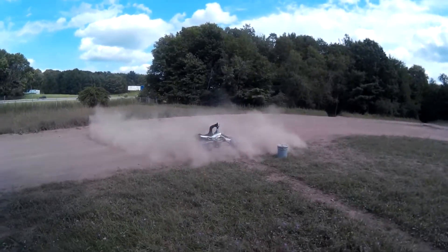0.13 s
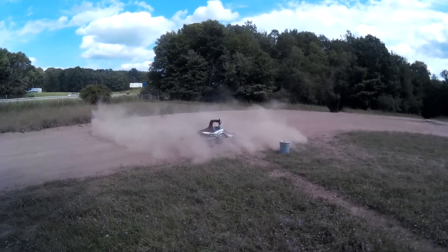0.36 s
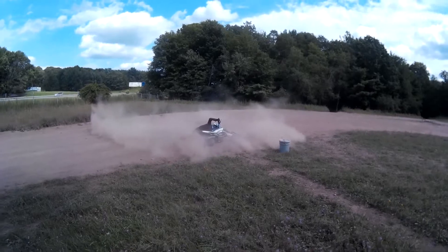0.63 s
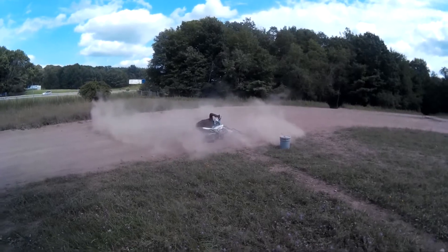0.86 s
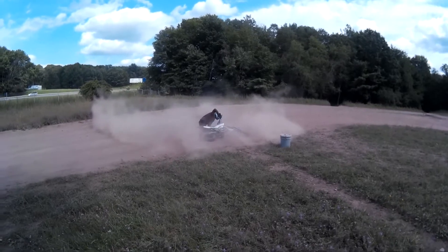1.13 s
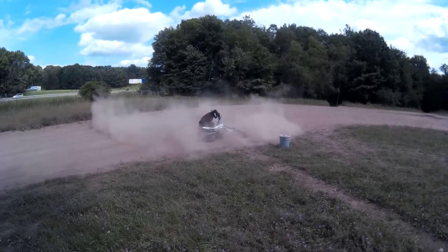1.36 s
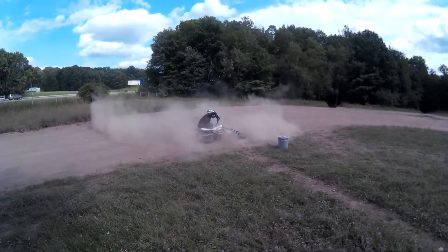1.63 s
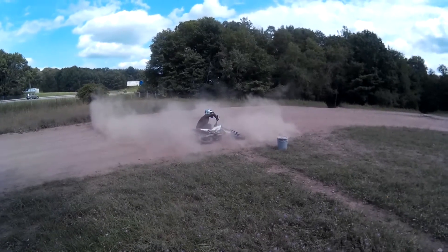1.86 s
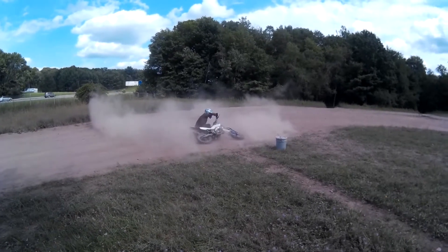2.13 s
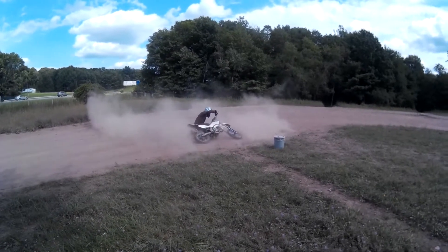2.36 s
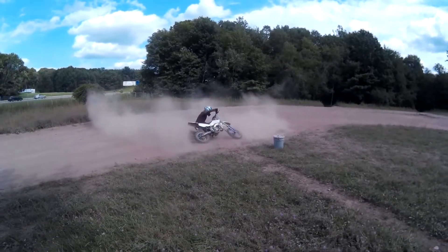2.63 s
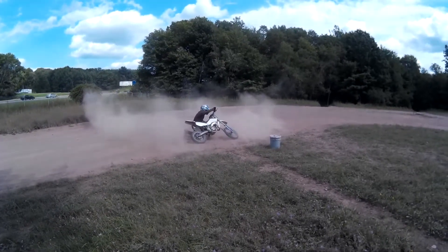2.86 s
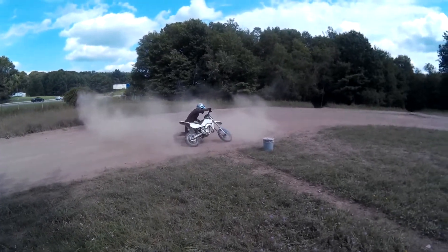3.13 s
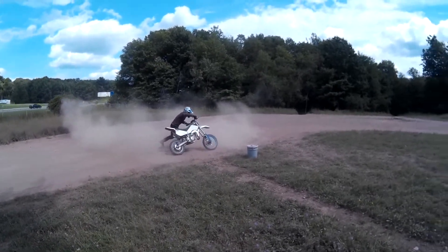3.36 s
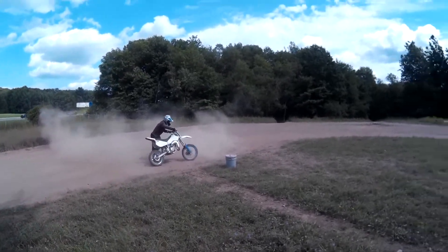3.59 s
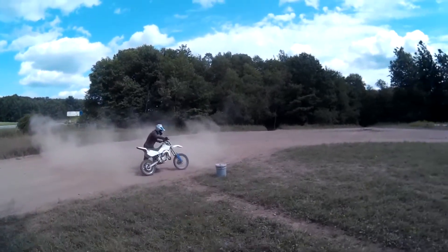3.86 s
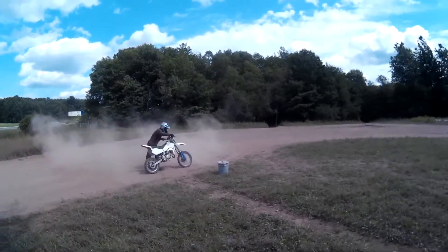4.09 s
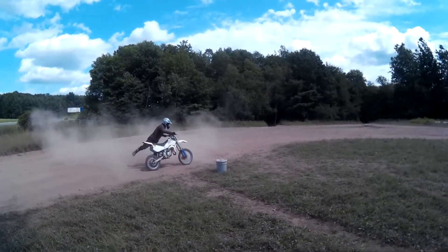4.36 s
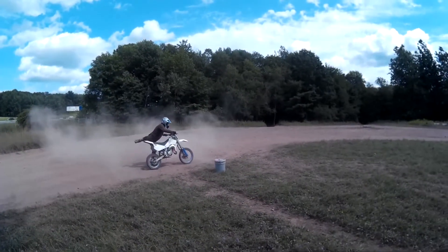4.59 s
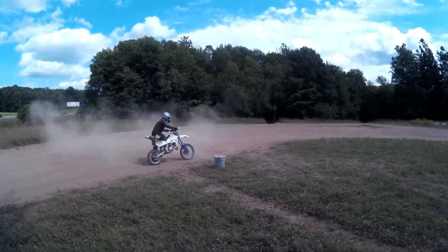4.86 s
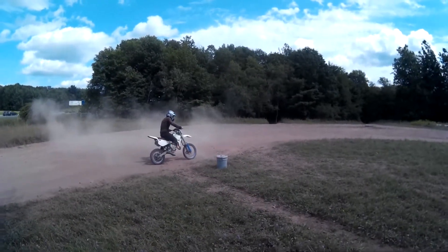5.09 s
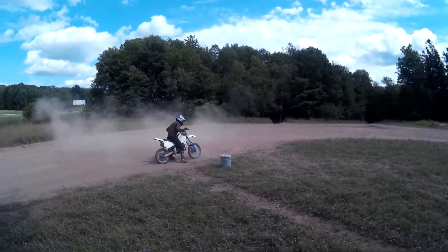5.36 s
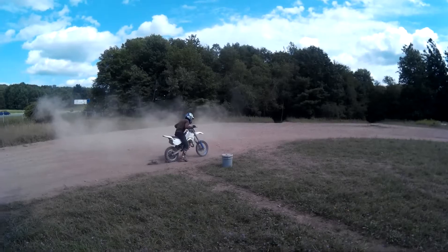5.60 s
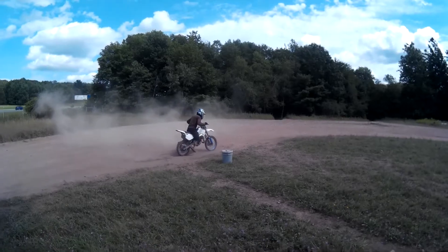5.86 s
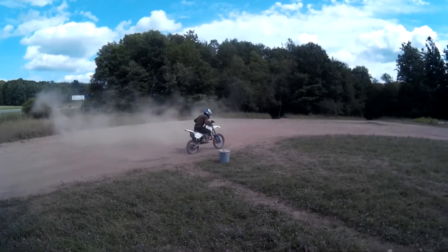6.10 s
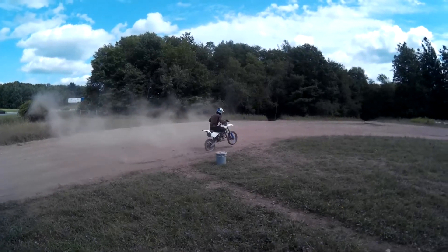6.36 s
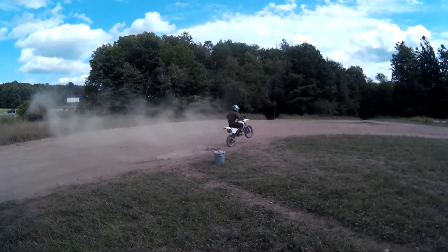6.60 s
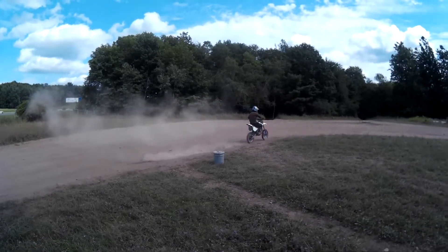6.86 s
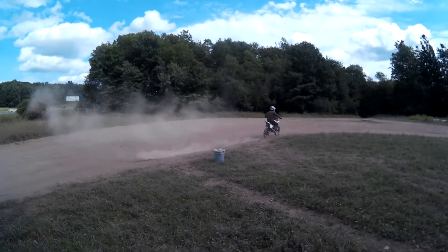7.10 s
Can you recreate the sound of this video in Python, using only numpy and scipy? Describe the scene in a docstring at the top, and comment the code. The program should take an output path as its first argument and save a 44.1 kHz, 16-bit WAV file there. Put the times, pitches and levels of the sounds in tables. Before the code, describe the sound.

A dirt bike engine in an open field, heard from a distance: uneven pops and brief raspy bursts, separated by clattering coasting. After about five seconds the bursts join into a continuous crackling ride-off, dipping, climbing to a high buzzing whine, breaking off for a moment, then revving once more. A close ground reflection and faint dull outdoor scatter colour it, over steady soft rumble.

```python
"""Small motorcycle on a dirt track

A small two-stroke is blipped and then ridden off, some way off in the open, over air rumble and faint insects.
The crank turns all the time; an open throttle makes the intake honk on every turn, the cylinder fires in runs
broken by misfires, each firing cracking out of the pipe, and the coasting engine rattles in between."""
import sys
import numpy as np
from scipy import signal
from scipy.fft import rfft, irfft
from scipy.io import wavfile
from scipy.ndimage import uniform_filter1d

SR = 44100
rng = np.random.default_rng(int(sys.argv[2]) if len(sys.argv) > 2 else 0)


def unload_audio(sound):
    """Save the sound as a 16-bit wav file, at the path given as the first command line argument."""
    columns = np.transpose(np.atleast_2d(sound))
    # keep every value between -1 and 1, then stretch to whole-number steps
    steps = np.round(np.clip(columns, -1, 1) * 32767)
    wavfile.write(sys.argv[1], SR, steps.astype(np.int16))


def amplitude_ratio(level_db):
    """Convert a level in decibels to the matching linear amplitude (field) ratio."""
    exponent = np.asarray(level_db, float) / 20
    return 10 ** exponent


N = 318402


def at_samples(rows):
    """Second column of a (s, value) curve at every sample."""
    return np.interp(np.arange(N) / SR, *np.transpose(rows))


def coloured_noise(spectrum):
    """Noise with the given spectrum (hz, level_db), rms 1."""
    hz, level_db = np.transpose(spectrum)
    bins_hz = np.maximum(np.arange(N // 2 + 1) * SR / N, 1)
    gain = amplitude_ratio(np.interp(np.log(bins_hz), np.log(hz), level_db))
    noise = irfft(rfft(rng.standard_normal(N)) * gain, N)
    return noise / np.std(noise)


def clicks(seconds, sizes):
    """One click of the given size at each moment."""
    out = np.full(N, 1e-18)
    at = np.round(seconds * SR).astype(int)
    inside = at < N
    out[at[inside]] += sizes[inside]
    return out


def resonate(x, modes):
    """Parallel resonances (hz, width_hz, level_db) with alternating signs; a click rings each at its level."""
    out = np.zeros(N)
    for k, (hz, width_hz, level_db) in enumerate(modes):
        radius = np.exp(-np.pi * width_hz / SR)
        w = 2 * np.pi * hz / SR
        ring = signal.lfilter([0, np.sin(w)], [1, -2 * radius * np.cos(w), radius ** 2], x)
        out += (-1) ** k * amplitude_ratio(level_db) * ring
    return out


def dying(x, decay_s):
    """Each click becomes an envelope that falls to 1/e in decay_s."""
    return signal.lfilter([1], [1, -np.exp(-1 / (decay_s * SR))], x)


def at_angle(turns, lag_turns):
    """Moments at which the crank passes the angle lag_turns after firing."""
    passes = np.arange(np.ceil(turns[0]), turns[-1]) + lag_turns
    return np.interp(passes, turns, np.arange(N) / SR)


# crank idling down: time_s, speed_turns_per_s
IDLE_SPEED = [(0.0, 48.0), (0.55, 35.0)]
# crank under load, clutch in: time_s, speed_turns_per_s
LOADED_SPEED = [(5.367, 96.7), (5.41, 93.1), (5.434, 75.9), (5.53, 65.2), (5.626, 58.6), (5.722, 82.6),
                (5.805, 112.0), (5.859, 119.1), (5.931, 148.0), (5.964, 141.8), (6.022, 146.4),
                (6.12, 158.7), (6.197, 157.7), (6.355, 170.6), (6.443, 154.7), (6.56, 112.0),
                (6.676, 114.4), (6.771, 103.1), (7.021, 112.0), (7.086, 116.1), (7.215, 131.0)]


def crank_speed():
    """(s, turns per s): spinning free, the crank gains speed with each firing of a run and coasts to the next."""
    clutch_s, kick_turns_per_s = 5.32, 3.9   # speed added per firing while free
    rows = list(IDLE_SPEED)
    for first_s, last_s, lazy, quick, _ in FIRING_RUNS:
        if last_s < clutch_s:
            mean = (2 * lazy + quick) / (last_s - first_s)
            gain = kick_turns_per_s * (lazy + quick)
            rows += [(first_s, mean - gain / 2), (last_s, mean + gain / 2)]
    return rows + LOADED_SPEED


# runs of firings: first_s, last_s, then further firings: lazy (every second turn), quick (every turn);
# crack_db (relative)
FIRING_RUNS = [(0.659, 0.6839, 0, 1, -10), (0.9552, 1.0584, 0, 5, -8.5), (1.452, 1.4769, 0, 1, -8.5),
               (1.6636, 1.6868, 0, 1, -9), (1.8849, 1.9905, 0, 6, -6), (2.1869, 2.2736, 3, 0, -3.5),
               (2.4775, 2.6213, 5, 0, -4.3), (2.8289, 2.9502, 4, 0, -5.5), (3.1897, 3.3119, 3, 3, -4.5),
               (3.8062, 3.8915, 0, 6, -6.5), (4.2747, 4.4012, 1, 7, -6.5), (4.746, 4.8512, 1, 6, -5.5),
               (5.1611, 5.3082, 2, 9, -2), (5.3293, 5.3471, 0, 2, -4), (5.3672, 5.4085, 0, 4, -4.5),
               (5.4336, 5.7208, 0, 19, -7.3), (5.7319, 5.8038, 0, 7, -2), (5.8228, 5.9299, 0, 14, -3),
               (5.9642, 6.4422, 0, 76, -5.5), (6.5602, 6.5863, 0, 3, -4), (6.6052, 6.6754, 0, 8, -6),
               (6.704, 6.7117, 0, 1, -8), (6.761, 6.78, 0, 2, -3), (6.8005, 6.9284, 0, 14, -2.5),
               (6.9568, 6.9654, 0, 1, -5), (6.995, 7.002, 0, 1, -4.5), (7.021, 7.2108, 0, 23, -3.5)]
# lone firings, some feeble: time_s, crack_db (relative)
LONE_FIRINGS = [(0.0028, -7), (0.5721, -20.5), (0.7307, -8), (0.9275, -31), (1.52, -24), (1.7282, -4.5),
                (2.0175, -0.5), (2.9881, 1), (3.5763, -24), (3.6074, -3.7), (4.8821, 0.5), (5.949, -4),
                (6.4847, -10)]


def crankshaft():
    """Firing times and levels, and the crank angle in turns, whole at each firing."""
    rich_db = 3.5   # a firing after a missed turn burns more charge
    t = np.arange(N) / SR
    free_turns = np.cumsum(at_samples(crank_speed())) / SR
    fired = [(np.interp(s, t, free_turns), crack_db) for s, crack_db in LONE_FIRINGS]
    for first_s, last_s, lazy, quick, crack_db in FIRING_RUNS:
        steps = np.repeat([0, 2, 1], [1, round(lazy), round(quick)])
        share = np.cumsum(steps) / steps.sum()
        ends = np.interp([first_s, last_s], t, free_turns)
        fired += zip(np.interp(share, [0, 1], ends), crack_db + rich_db * (steps != 1))
    angles, levels_db = np.transpose(sorted(fired))
    whole = np.cumsum(np.maximum(np.round(np.diff(angles, prepend=angles[0])), 1))
    turns = free_turns + np.interp(free_turns, angles, whole - angles)
    return np.interp(angles, free_turns, t), levels_db, turns


# rumble spectrum: freq_hz, density_db (per Hz, relative)
AIR_SPECTRUM = [(12, -45), (20, -15), (75, 1), (97, 0), (497, -5.5), (669, -3), (700, -0.5), (910, -9),
                (1540, -120)]


def open_air():
    """Steady low rumble of the open air: shaped noise."""
    rms_db = -44
    return amplitude_ratio(rms_db) * coloured_noise(AIR_SPECTRUM)


def insects():
    """Faint steady chorus in the grass: a narrow band of noise."""
    band_hz, rms_db = (5440, 5930), -55.5
    band = signal.butter(2, band_hz, "band", fs=SR, output="sos")
    chorus = signal.sosfilt(band, rng.standard_normal(N))
    return amplitude_ratio(rms_db) * chorus / np.std(chorus)


# rattle level, lower in the fast ride from 5.95 s: time_s, level_db (before trim and speed gain)
RATTLE_LEVEL = [(0.0, -30), (0.44, -33), (2.24, -28.5), (4.62, -26), (5.15, -25.5), (5.7, -25.5),
                (5.95, -31)]
# rattle spectrum: freq_hz, density_db (per Hz, relative)
CASING_SPECTRUM = [(290, -32), (500, -32), (750, -27), (819, -11.5), (946, -10), (1440, -2), (1690, -4),
                   (1900, 0.5), (2260, -7), (2890, -23), (6140, -22.5), (9630, -25.5), (10500, -26),
                   (16000, -52)]
# bright part of the rattle, muffled while the machine lies: time_s, gain_db
BRIGHT_GAIN = [(0, -7), (3.2, 0), (3.6, -1.5), (7.22, -0.5)]
# ringing casing: freq_hz, width_hz, level_db (relative)
CASING_MODES = [(1475, 77, 2), (1630, 73, 1), (2770, 200, 0), (3850, 150, -14.5)]


def rattle(turns):
    """Piston and gears knock the casing at two angles of each turn, unevenly, over the whirr of the bearings."""
    knocks_s = np.concatenate([at_angle(turns, 0.05), at_angle(turns, 0.59)])
    knocks = clicks(knocks_s, amplitude_ratio(3.0 * rng.standard_normal(len(knocks_s))))
    shaking = 1.36 + dying(knocks, 0.005)
    whirr = shaking * coloured_noise(CASING_SPECTRUM)
    dull = signal.sosfilt(signal.butter(2, 6000, fs=SR, output="sos"), whirr)
    bright = amplitude_ratio(at_samples(BRIGHT_GAIN)) * (whirr - dull)
    ringing = resonate(shaking * rng.standard_normal(N), CASING_MODES)
    shaken = dull + bright + 0.85 * np.std(whirr) * ringing / np.std(ringing)
    speed_gain = (at_samples(crank_speed()) / 70) ** 0.27
    return amplitude_ratio(at_samples(RATTLE_LEVEL) - 1.5) * speed_gain * shaken / np.std(shaken)


# exhaust pipe and silencer: freq_hz, width_hz, lying_db, upright_db, riding_off_db (relative)
PIPE_MODES = [(520, 370, -12, -8, -16.5), (1156, 128, -11, -1.5, -7), (1400, 190, -5.5, 3, 0.5),
              (1692, 151, 1, -3, 3), (2082, 132, 0, -4, -3), (2735, 200, 3, 1.5, -6.5),
              (3147, 194, -5, -10.5, -2.5), (3690, 373, -7.5, -5, -2), (4265, 296, -10.5, -5.5, -5),
              (4990, 1500, 2, 2.5, 0.5), (7010, 790, -0.5, 3, 4), (8680, 1130, -4.5, 1, -2.5),
              (11400, 1700, -5.5, 0, -2)]
# stance of the machine: time_s, stance (0 lying, 1 upright, 2 riding off)
STANCE_CURVE = [(0, 0.077), (1.9, 0.11), (3.5, 0.83), (5.8, 1.44), (6.9, 1.79), (7.22, 2.8)]


def exhaust(fired_s, level_db):
    """A steep pressure pulse, its inner echoes and a hissing burst of gas ring the modes of the pipe."""
    sizes = amplitude_ratio(level_db + 0.7 * rng.standard_normal(len(fired_s)))
    pulses = clicks(fired_s, sizes)
    age_s = np.arange(round(0.08 * SR)) / SR
    fading = amplitude_ratio(-19.0) * np.exp(-age_s / 0.0021) + amplitude_ratio(-28.0) * np.exp(-age_s / 0.014)
    fading *= np.minimum(age_s / 0.0015, 1)   # the bare pulse comes first
    hiss_gain = 0.3 * np.minimum(80 / at_samples(crank_speed()), 1) ** 2   # steadier at speed
    hiss = signal.fftconvolve(pulses, fading)[:N] * rng.standard_normal(N)
    driven = pulses + hiss_gain * hiss
    # fast gas flow sweeps echoes out
    damped = np.minimum(115 / np.interp(fired_s, *np.transpose(crank_speed())), 1)
    # inner echoes repeat from firing to firing and change colour only slowly
    for weight in (np.cos(2.5 * fired_s), np.sin(2.5 * fired_s)):
        echoes = fading * rng.standard_normal(len(age_s))
        driven += signal.fftconvolve(clicks(fired_s, sizes * weight * damped), echoes)[:N]
    out, stance = np.zeros(N), at_samples(STANCE_CURVE)
    # which modes carry depends on where the outlet points
    for k, (hz, width_hz, *heard_db) in enumerate(PIPE_MODES):
        gain = amplitude_ratio(np.interp(stance, range(3), heard_db))
        out += (-1) ** k * gain * resonate(driven, [(hz, width_hz, 0)])
    return -amplitude_ratio(-2.6) * out


# extra path over the ground: time_s, lag_ms
GROUND_ECHO = [(0, .24), (5.7, 0.247), (6.45, .227), (7.22, .2)]


def outdoors(x):
    """A close echo off the ground combs the sound; grass, slope and trees scatter a faint dull tail."""
    delayed_at = np.arange(N) - at_samples(GROUND_ECHO) * SR / 1000
    out = x + 0.55 * np.interp(delayed_at, np.arange(N), x)
    age_s = np.arange(round(0.4 * SR)) / SR
    envelope = np.exp(-age_s / 0.07) * np.minimum(age_s / 0.0076, 1)
    scatter = rng.standard_normal(len(age_s)) * envelope
    scatter = signal.sosfilt(signal.butter(1, 3000, fs=SR, output="sos"), scatter)
    scatter /= np.sqrt(np.sum(scatter ** 2))
    return out + amplitude_ratio(-20.0) * signal.fftconvolve(out, scatter)[:N]


# throttle twists: opens_s, shuts_s, first_honk_db, last_honk_db (before smoothing and speed scaling)
THROTTLE_TWISTS = [(0.53, 0.693, -31.5, -25), (0.877, 1.013, -19, -21.5), (1.374, 1.467, -18, -24.5),
                   (1.59, 1.702, -16, -30), (1.805, 2.07, -17, -27.5), (2.103, 2.28, -20.5, -13),
                   (2.398, 2.601, -21.5, -16), (2.739, 2.975, -24.5, -17), (3.125, 3.283, -21, -20.5),
                   (3.481, 3.598, -26, -33.5), (3.743, 3.868, -17, -26), (4.232, 4.387, -21.5, -26.5),
                   (4.692, 4.876, -19.5, -23), (5.128, 5.417, -16, -18), (5.442, 5.679, -19, -29),
                   (5.679, 5.947, -18.5, -15.5), (5.969, 6.404, -16, -14), (6.503, 6.68, -18, -27.5),
                   (6.745, 7.21, -17, -27)]


def throttle():
    """Honk level: the slide lifts and drops within some hundredths of a second, never quite shut."""
    t, level = np.arange(N) / SR, np.full(N, amplitude_ratio(-53.5))
    for opens_s, shuts_s, first_db, last_db in THROTTLE_TWISTS:
        is_open = (t > opens_s) & (t < shuts_s)
        level += is_open * amplitude_ratio(np.interp(t, [opens_s, shuts_s], [first_db, last_db]))
    slide_s = 0.013
    return dying(dying(level, slide_s), slide_s) / (slide_s * SR) ** 2


# air box and intake duct: freq_hz, width_hz, level_db (relative)
AIR_BOX_MODES = [(188, 72, -10.5), (289.2, 66, -1.5), (405, 90, -3), (566, 201, -1)]


def intake(turns, fired_s):
    """The port opens and slams shut once a turn; both jolts ring the air box, and the pumping hums at speed."""
    blowback_db = 3.0   # a turn that fired jolts the intake harder
    opens_s, shuts_s = at_angle(turns, 0.3086), at_angle(turns, 0.7477)
    n_shuts = len(shuts_s)
    chance = rng.standard_normal((len(opens_s), 4))
    fired = np.isin(np.arange(len(opens_s)), np.searchsorted(opens_s, fired_s))
    speed = np.interp(opens_s, *np.transpose(crank_speed()))
    slam = np.clip((speed[:n_shuts] - 36) / 35, 0.05, 0.9)   # the closing jolt needs speed
    uneven_db = 2.5 * 50 / speed   # steadier at speed
    late_s = 0.0003 * np.minimum(65 / speed, 1) ** 3 * chance[:, 2:].T   # and more punctual
    opening = amplitude_ratio(uneven_db * chance[:, 0] + blowback_db * fired)
    closing = slam * amplitude_ratio(uneven_db[:n_shuts] * chance[:n_shuts, 1])
    jolts = clicks(opens_s + late_s[0], opening) + clicks(shuts_s + late_s[1, :n_shuts], closing)
    jolts += 0.005 * rng.standard_normal(N)   # turbulence in the duct
    band = signal.butter(2, [140, 1200], "band", fs=SR, output="sos")
    honk = resonate(signal.sosfilt(band, jolts), AIR_BOX_MODES)
    honk /= np.sqrt(uniform_filter1d(honk ** 2, size=2600) + 1e-12)   # running rms near 1
    fast = at_samples(crank_speed()) / 150
    hum = amplitude_ratio(-3.5) * fast ** 2.6 * np.sin(2 * np.pi * turns)
    hum += amplitude_ratio(4.0) * fast ** 2.5 * np.sin(4 * np.pi * turns + 1.6)
    return throttle() * (honk + hum) / np.sqrt(1 + 1.9 * fast ** 3.2)


def scene():
    """Engine in the open air; the intake is left without ground echo and scatter."""
    fired_s, levels_db, turns = crankshaft()
    engine = outdoors(exhaust(fired_s, levels_db) + rattle(turns)) + intake(turns, fired_s)
    return (engine + open_air() + insects())[None]


def top_cut(x):
    """Nothing passes above the cut-off."""
    return signal.sosfilt(signal.butter(12, 16500, fs=SR, output="sos"), x)


def record(dry):
    """The loudest cracks overload the input and are rounded off; the deepest bass is cut."""
    top, knee = 0.76, 5.0   # ceiling (full scale 1), sharpness
    rounded = dry / (1 + np.abs(dry / top) ** knee) ** (1 / knee)
    bass_cut = signal.butter(2, 32, "high", fs=SR, output="sos")
    return top_cut(signal.sosfilt(bass_cut, rounded))


dry = scene()
out = record(dry)
unload_audio(out)
```